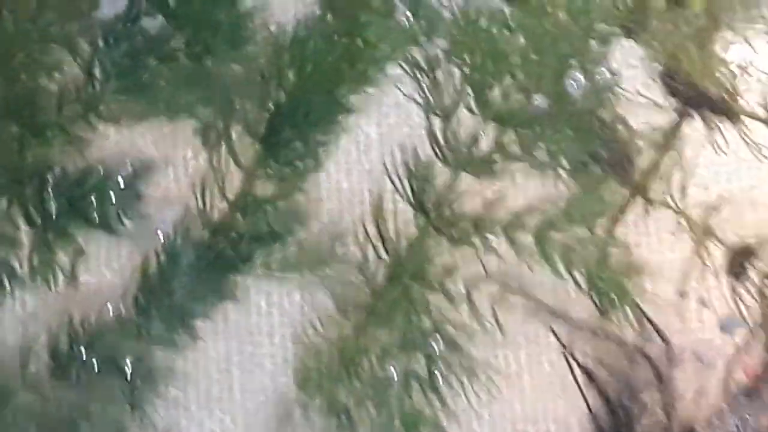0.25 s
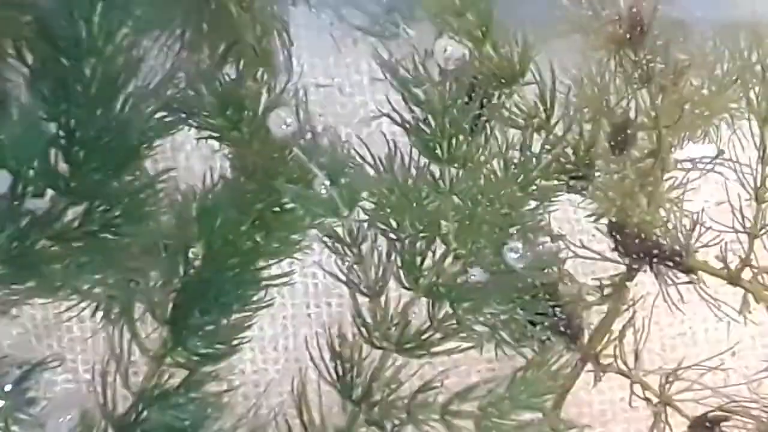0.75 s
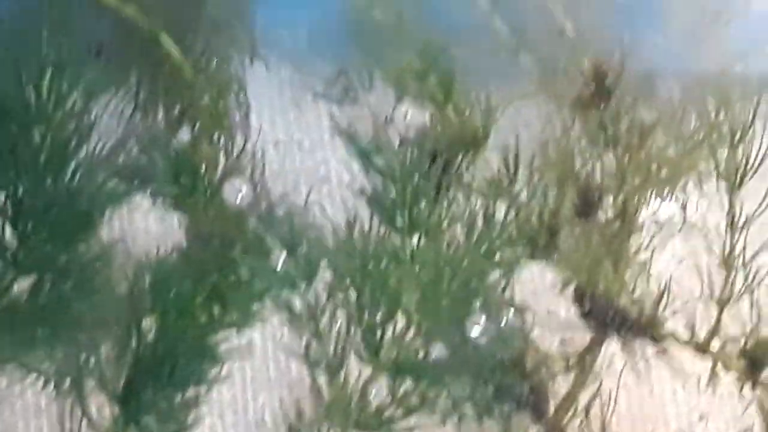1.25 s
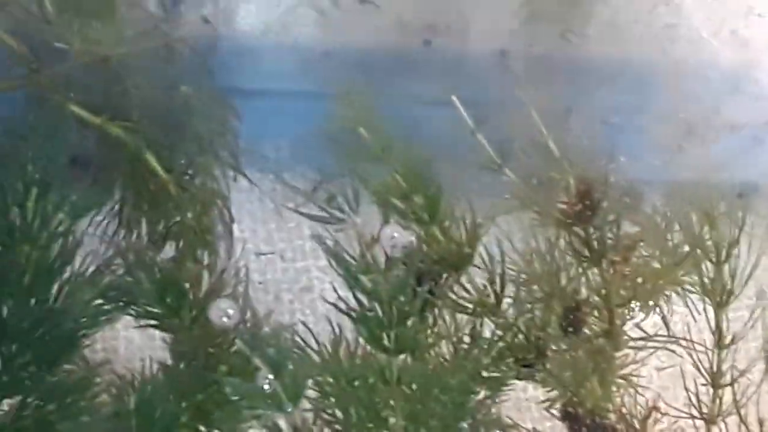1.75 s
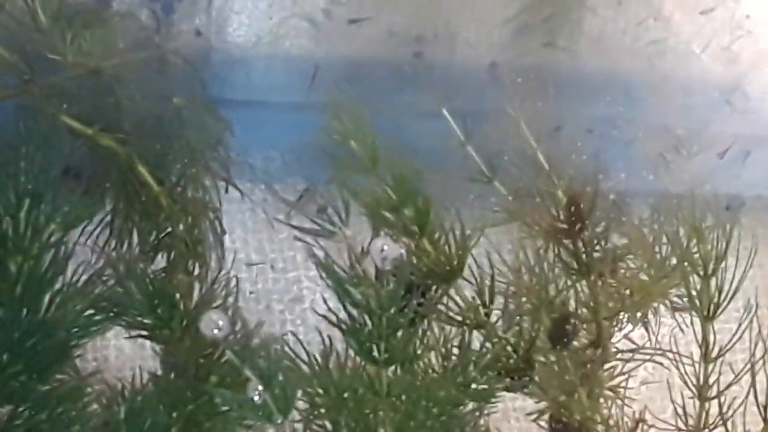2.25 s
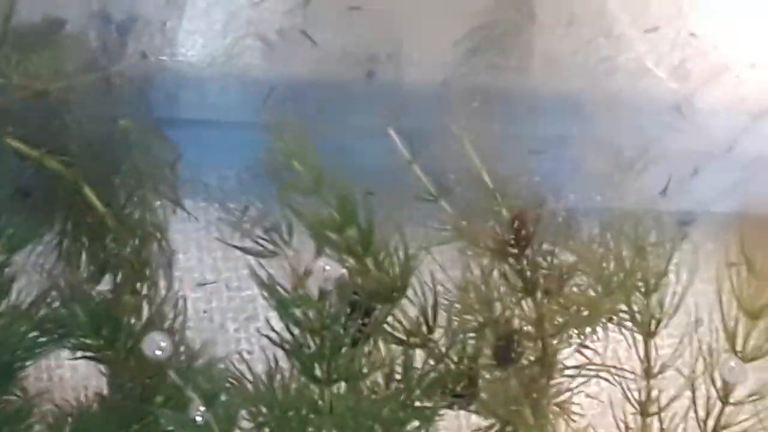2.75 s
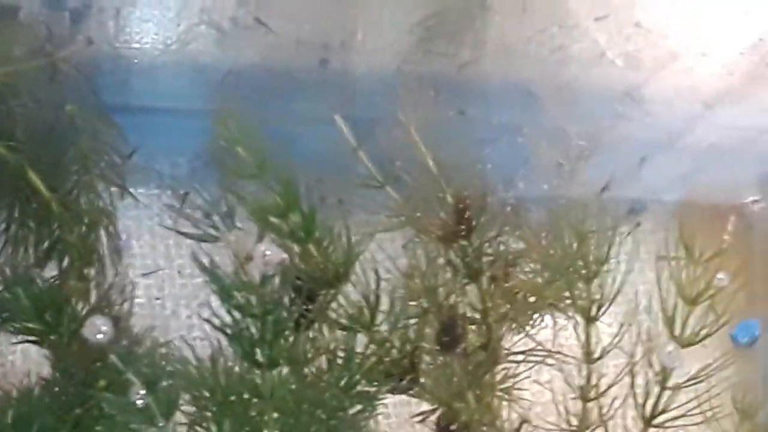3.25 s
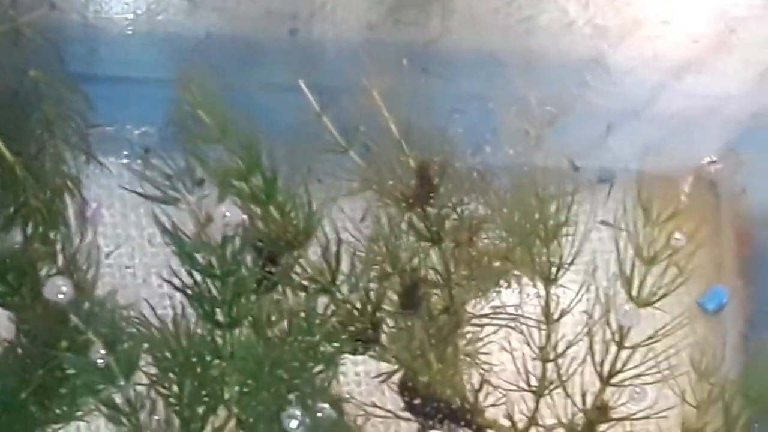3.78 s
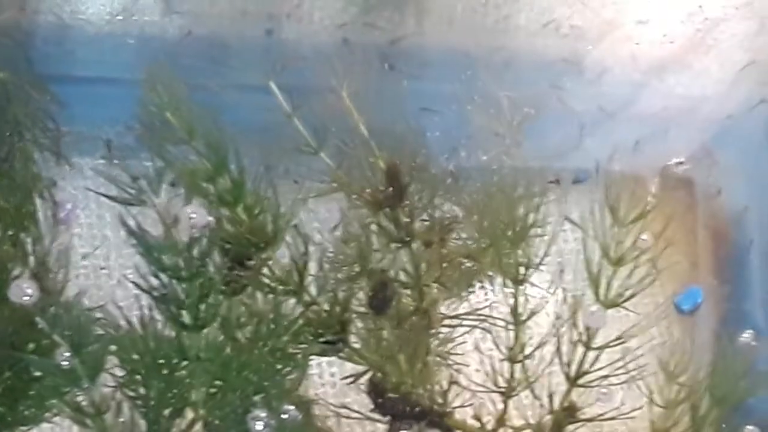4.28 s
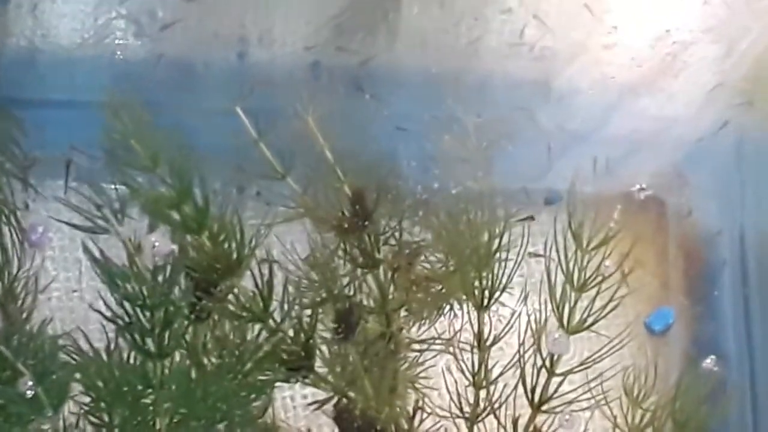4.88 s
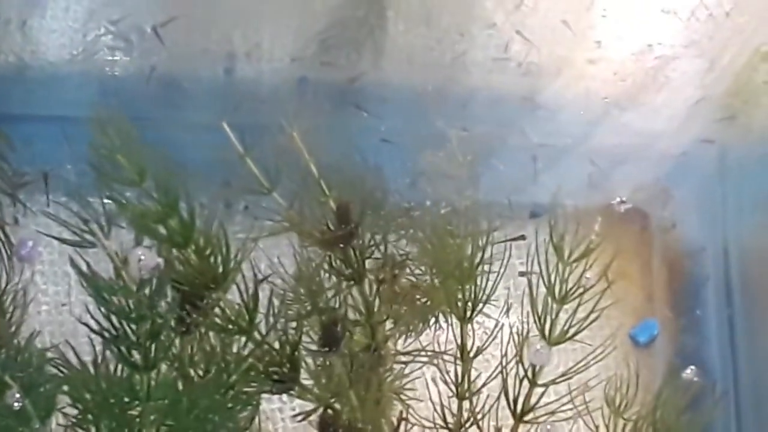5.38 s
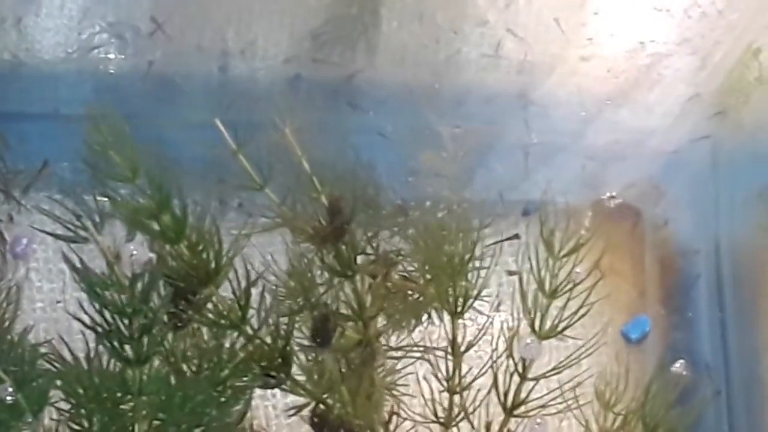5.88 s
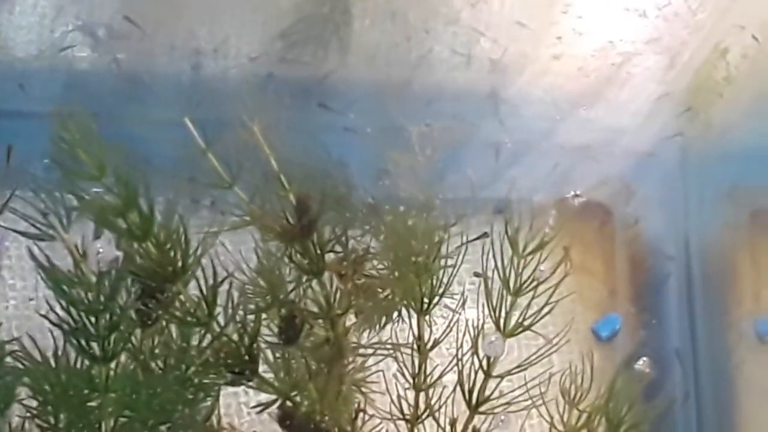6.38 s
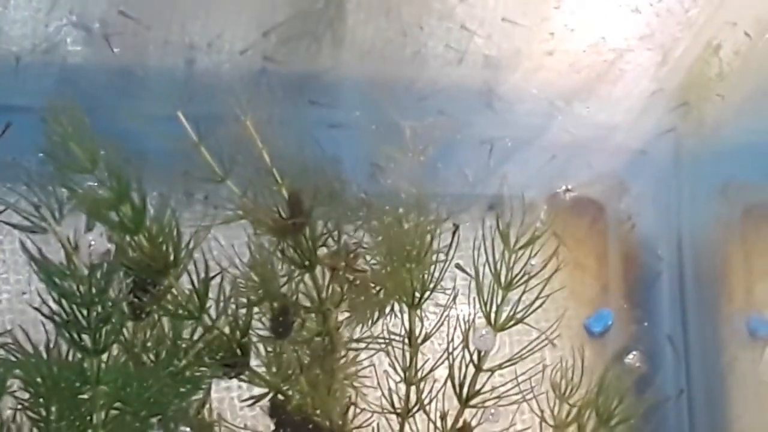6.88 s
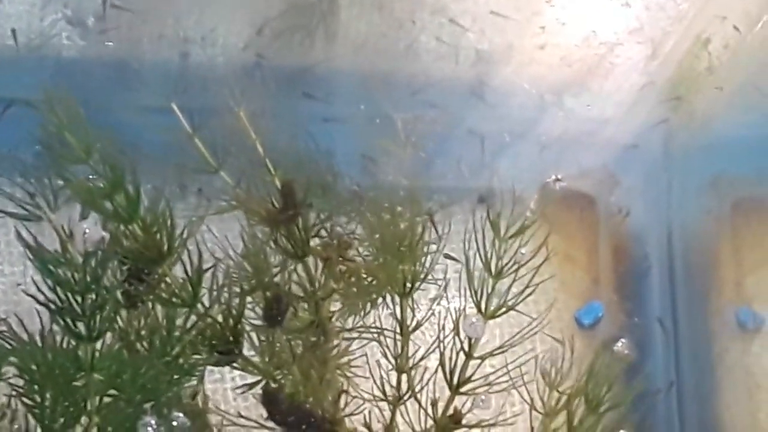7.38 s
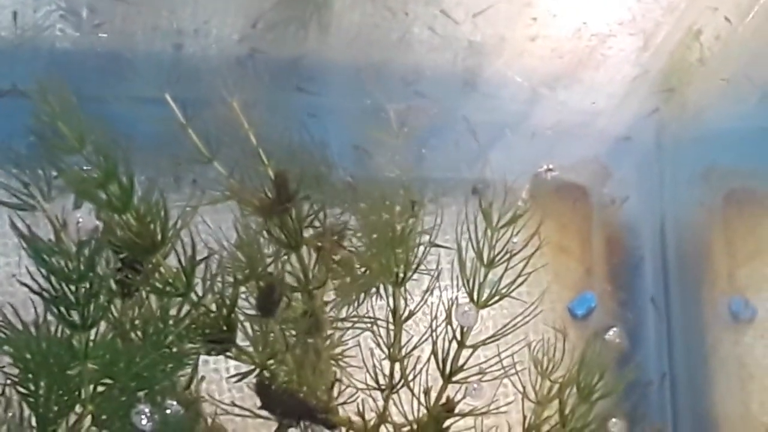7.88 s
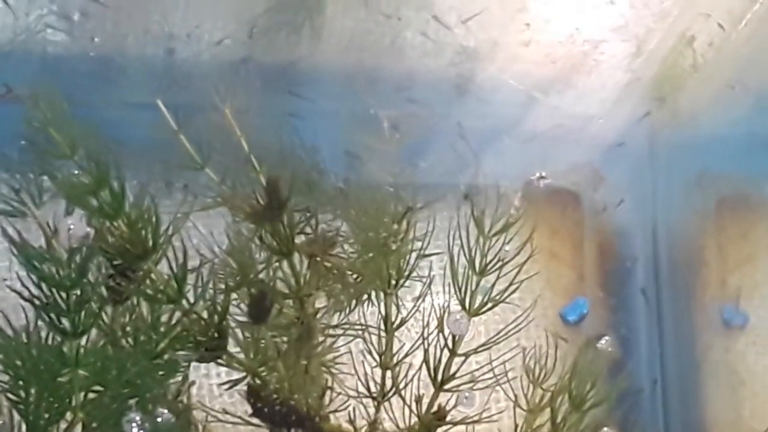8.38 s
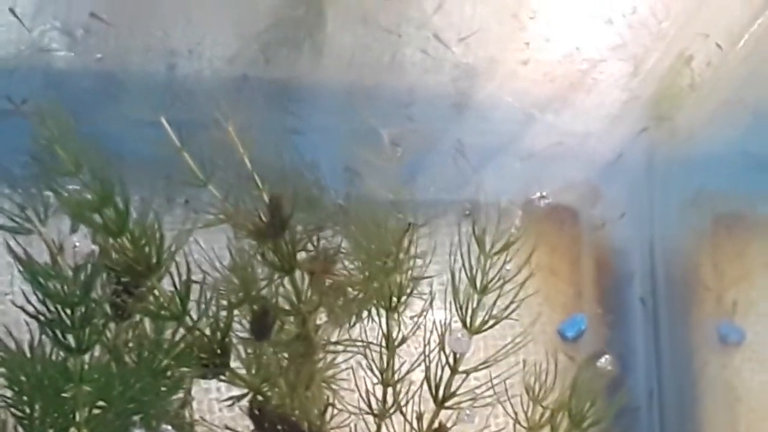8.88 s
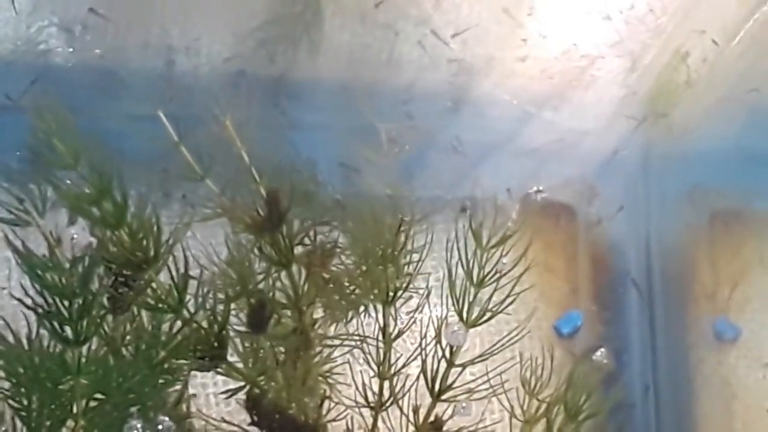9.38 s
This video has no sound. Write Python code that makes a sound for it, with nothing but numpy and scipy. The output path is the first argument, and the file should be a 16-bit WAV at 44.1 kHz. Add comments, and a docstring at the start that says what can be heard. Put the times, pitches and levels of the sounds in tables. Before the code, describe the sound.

For about 9.6 seconds an aquarium pump drones steadily, a deep 60-cycle hum rich in low harmonics, with soft rumbling churned water beneath; it grows slightly nearer in the first second, then stays put. Faint gurgling resonance of the tank walls sits in the midrange. Over it runs a continuous delicate fizz of bursting bubble films, crisp and irregular, with short crackling sprays, stronger near 0.7, 1.15, 1.9, 3.4 and 7.0 seconds. Single bubbles tick or plink at random, with very bright sharp ticks at about 5.0 and 5.8. Larger bubbles knock the wall hollowly near 1.7, 3.4, 3.55 and most clearly 5.35, then more softly around 7.0, 8.0 and 9.5. The fizz briefly swells around 4.1, 5.9 and 8.85 and dips at 4.3 and 9.2. Close microphone, small room, treble leaning left; the hum continues to the end.

```python
"""A mains-driven aquarium pump drones steadily in a small room: mains harmonics over churned-water noise.
Moving water excites the resonant modes of the tank walls, over a still background noise.
Bubble films burst at the surface in fizzing clumps, as short noise bursts passed through resonances.
Now and then a single bubble ticks or plinks as a decaying sine, or a larger one knocks the tank walls."""
import sys
import numpy as np
from scipy import signal
from scipy.fft import rfft, irfft
from scipy.io import wavfile

SR = 44100
rng = np.random.default_rng(int(sys.argv[2]) if len(sys.argv) > 2 else 0)


def unload_audio(sound):
    """Save the sound as a 16-bit wav file, at the path given as the first command line argument."""
    columns = np.transpose(np.atleast_2d(sound))
    # keep every value between -1 and 1, then stretch to whole-number steps
    steps = np.round(np.clip(columns, -1, 1) * 32767)
    wavfile.write(sys.argv[1], SR, steps.astype(np.int16))


N = 425124
TIME = np.arange(N) / SR  # s
BINS = np.fft.rfftfreq(N, 1 / SR)  # Hz


def amp(db):
    """Level law: decibels to amplitude gain."""
    return 10 ** (np.asarray(db) / 20)


def evened(x):
    """Power normalisation: scales to rms 1."""
    return x / np.sqrt(np.mean(x ** 2) + 1e-20)


def spectrum_at(points, hz):
    """Spectral interpolation: reads a table on a log-frequency axis."""
    f, value = np.transpose(points)
    return np.interp(np.log(hz + 1), np.log(f + 1), value)


def level_at(points, seconds):
    """Temporal interpolation: reads a table of times and levels in dB."""
    return np.interp(seconds, *np.transpose(points))


def add(mix, start_s, sound):
    """Superposition: sums a sound into the mix from its start time."""
    part = mix[..., max(round(start_s * SR), 0):][..., :sound.shape[-1]]
    part += sound[..., :part.shape[-1]]


def drift(rate_hz):
    """Slow random modulation: noise through a Gaussian low-pass, at rms 1."""
    smooth = np.exp(-(BINS / rate_hz) ** 2)
    return evened(irfft(rfft(rng.standard_normal(N)) * smooth, N))


def colour(x, points):
    """Minimum-phase filtering: the log gain alone fixes the phase of a causal response."""
    log_gain = np.log(amp(spectrum_at(points, abs(np.fft.fftfreq(2048, 1 / SR)))))
    taps = np.fft.ifft(np.exp(np.conj(signal.hilbert(log_gain)))).real
    return signal.oaconvolve(x, taps[None], axes=1)[:, :N]


def resonance(f, hz, width):
    """Damped resonance: the response of one mode, 1 at its centre."""
    return 1j * f * width / (hz ** 2 - f ** 2 + 1j * f * width)


# likeness of left and right noise: frequency_hz [Hz], likeness [0-1]
LIKENESS = [(60, 1), (300, 0.93), (640, 0.97), (1400, 0.72), (3000, 1), (15000, 0.72)]


def noise(gain):
    """Partial coherence: stereo noise of rms 1, the right channel sharing part of the left."""
    left, other = rfft(rng.standard_normal((2, N)))
    same = np.clip(spectrum_at(LIKENESS, BINS), 0, 1)
    right = same * left + np.sqrt(1 - same ** 2) * other
    return evened(irfft(np.array([left, right]) * gain, N))


# reverberation time of the small room: frequency_hz [Hz], t60_s [s]
REVERBERATION = [(200, 0.6), (1500, 0.32), (5000, 0.15), (15000, 0.082)]


def room(x, early_db, late_db, early_s):
    """Reverberation: sparse early reflections, then a tail decaying faster in the treble."""
    size = SR // 4
    t = np.arange(size) / SR
    taps = rng.standard_normal((2, size)) * (rng.random(size) < .12)
    early = (taps + 0.93 * taps[::-1]) * np.exp(-t / early_s) * (t > .0006)
    tail = rng.standard_normal((2, size)) * (t > .006)
    hz, at, z = signal.stft(tail, SR, nperseg=256)
    decay = amp(-60 * at / spectrum_at(REVERBERATION, hz)[:, None])
    late = signal.istft(z * decay, SR, nperseg=256)[1][:, :size]
    echo = (amp(early_db) * evened(early) + amp(late_db) * evened(late)) / np.sqrt(size)
    echo[:, 0] += 1  # the direct path
    return signal.oaconvolve(x * np.ones((2, 1)), echo, axes=1)[:, :N]


# relative spectrum of the still background: frequency_hz [Hz], density_db [dB per Hz]
BACKGROUND = [(300, 13.5), (640, -5.5), (950, 4.5), (2400, -11), (2800, -5), (4500, -2.5), (7400, -11.5),
              (9300, -13.5), (12000, -10), (15500, -4.5)]
# modes of the tank walls: pitch_hz [Hz], width_hz [Hz], flow_db [dB, relative, in the current],
# change_db [dB, start to end, as the microphone moves along the glass], struck_db [dB, relative, when struck]
WALL_MODES = [(796, 152, -6.5, -3.5, -25), (1207, 138, -4, -1.5, -31), (1289.5, 49, -3, -2, -9),
              (1415.5, 142, 2, -2.5, 3), (1574, 43, -7.5, -1.5, -28), (1733, 51, -9, -5.5, -10.5),
              (1946, 145, -8, 4, -25), (2068, 92, -10, -3, -1.5), (2307, 233, -6.5, -3, -11),
              (2479, 110, -20.5, -18, -9)]


def tank(ring_db=-67, background_db=-65.0, gurgle_db=2, gurgle_hz=11.3):
    """Modal excitation: the current drives each wall mode, whose level gurgles on its own."""
    current = rfft(noise(1))
    out = amp(background_db) * noise(amp(spectrum_at(BACKGROUND, BINS)))
    for hz, width, flow_db, change_db, _ in WALL_MODES:
        mode = evened(irfft(current * resonance(BINS, hz, width) ** 2, N))
        moved_db = change_db * (TIME / TIME[-1] - .5)
        out += mode * amp(ring_db + flow_db + gurgle_db * drift(gurgle_hz) + moved_db)
    return out


def pops(times, level_db, spread_db, splash_db, splash_s=0.0033, breadth=0.17, snap=0.23, small_db=3.5):
    """Impulsive radiation: each bursting film has its own strength, pitch, side and reflections."""
    size, count = 512, len(times)
    t, f = np.arange(size) / SR, np.fft.rfftfreq(size, 1 / SR)
    chance, pitch, lean = rng.random((count, 3)).T
    left, right = rng.standard_normal((count, 2, size)).transpose(1, 0, 2)
    splash = np.array([left + 1.1 * right, right + 1.44 * left]) * np.exp(-t / splash_s)
    splash = evened(splash) / np.sqrt(size)
    # high pops beam straight out; low ones bounce round the tank
    burst = splash * amp(splash_db - 8 * pitch)[:, None]
    burst[:, :, 0] += 1 + np.outer([1, -1], lean - .5) * .5
    hz = (3500 * (16000 / 3500) ** pitch)[:, None]
    burst = rfft(burst) * (snap + resonance(f, hz, breadth * hz))
    burst = evened(irfft(burst, size)) / np.sqrt(size)
    # most are faint and a few stand out, above all among the high ones
    rarity = np.minimum(-np.log(1 - chance), 4)
    strength = evened(amp((spread_db + small_db * (pitch - .5)) * rarity))
    burst *= (amp(level_db) * strength)[:, None]
    # each pop lands at its own moment
    at = (np.maximum(times, 0) * SR).astype(int)[:, None] + np.arange(size)
    return np.array([np.bincount(at.ravel(), side.ravel(), N)[:N] for side in burst])


def chains(count=330, size=10, chain_db=-48.5, uneven_db=7, chain_s=.0045):
    """Triggered cascade: a bursting film takes its neighbours with it; gives times and levels of pops."""
    chance = rng.random((count, 2 + 2 * size))
    starts = (np.arange(count) + 2 * chance[:, 0]) * N / SR / count
    # each neighbour waits twice, to be shaken and to give way, so a chain swells and dies
    waits = -chain_s * np.log(1 - chance[:, 2:]).reshape(count, size, 2).sum(axis=2)
    levels_db = chain_db + uneven_db * (chance[:, 1] - .5)
    return (starts[:, None] + waits).ravel(), np.repeat(levels_db, size)


# relative colour of the bursting films: frequency_hz [Hz], gain_db [dB]
FILM_COLOUR = [(500, -6), (1400, 9.5), (2300, 3.5), (2950, -2.5), (3800, 3), (5000, 1), (6200, 1.5),
               (7400, 7.5), (8400, -4), (9500, -6.5), (11500, 1), (13000, 0.5), (15000, 6), (16000, -3)]
# slow surges and lulls of single and chained pops: time_s [s], level_db [dB, relative]
SURGES = [(0, -3), (.2, 1.5), (1, 1), (2.25, 3), (3.15, 1.5), (3.65, -1.5), (4.12, 5.5), (4.27, -6.5),
          (4.42, 1.5), (5.7, 0.5), (5.9, 5.5), (6.5, -1.5), (6.81, 1), (6.88, -1), (7.9, -0.5), (8.85, 4.5),
          (9.18, -4.5), (9.64, 4.5)]
# rafts of bubbles that collapse together: start_s [s, nominal], level_db [dB, before the film colour]
COLLAPSES = [(.212, -46), (.329, -46), (.461, -45), (.667, -39), (1.15, -37.5), (1.235, -45.5),
             (1.592, -44), (1.65, -40.5), (1.922, -37.5), (2.298, -41), (2.515, -46), (2.87, -46.5),
             (3.192, -46), (3.412, -37), (3.837, -44), (3.919, -42), (4.377, -43), (4.688, -41.5),
             (4.799, -41.5), (4.932, -42), (5.03, -41.5), (5.249, -46), (5.497, -44), (5.883, -41.5),
             (6.023, -46), (6.305, -45.5), (6.926, -44), (7.034, -37.5), (7.18, -46.5), (7.28, -44),
             (7.512, -42), (8.128, -45.5), (8.309, -45), (8.747, -41), (8.86, -48.5), (9.451, -43.5)]
RAFT_S, RAFT_GROWTH = .02, .7  # half-length of a middling spray [s]; how strongly length follows level


def fizz(single_db=-52.0, count=2600):
    """Random point process: films burst singly, in chains and in the quick sprays of collapsing rafts."""
    times = rng.random(count) * N / SR
    singles = pops(times, single_db + level_at(SURGES, times), spread_db=1.0, splash_db=12.0)
    times, db = chains()
    chained = pops(times, db + level_at(SURGES, times), spread_db=3.5, splash_db=6.5)
    start_s, db = np.repeat(COLLAPSES, 30, axis=0).T  # 30 pops to a raft
    length = RAFT_S * amp(RAFT_GROWTH * (db - db.mean()))  # louder rafts last longer
    # a raft gives way gradually, bursting fastest in its middle
    times = start_s + length * rng.triangular(-.5, .5, 1.5, len(start_s))
    sprays = pops(times, db, spread_db=3.5, splash_db=6.5)
    return room(colour(singles + chained + sprays, FILM_COLOUR), early_db=-44, late_db=-8, early_s=.01)


def bubble(hz, cycles, rise, snap):
    """Volume oscillation: a film snaps and the air pocket rings, rising in pitch as it decays."""
    age = np.arange(SR // 30) / SR * hz / cycles  # in decay times
    phase = 2 * np.pi * cycles * (age + rise * (age - 1 + np.exp(-age)))
    ring = np.sin(phase) * np.exp(-age) * (1 - np.exp(-4 * age))
    ring /= abs(ring).max()
    ring[:2] += snap * np.array([1, -1])
    return ring


# single bubbles, low blips through plinks to high ticks:
# start_s [s], level_db [dB peak of the ring before snap and echoes], pitch_hz [Hz at the onset]
SINGLE_BUBBLES = [(.3326, -47, 13200), (.7741, -45, 6900), (.8131, -42, 15500), (1.0056, -48, 13500),
                  (1.1408, -47, 15400), (1.2805, -43, 13700), (1.3229, -51, 4060), (1.8317, -42, 15400),
                  (1.856, -39.5, 11800), (1.856, -41.5, 6700), (1.9307, -41.5, 5050),
                  (1.9849, -41.5, 15100), (2.0782, -37, 15500), (2.156, -52, 3400), (2.1765, -43, 11200),
                  (2.3224, -39, 6900), (2.3416, -45.5, 14100), (2.7272, -52, 12000), (2.882, -49, 4470),
                  (3.2076, -40, 15300), (3.364, -48, 3400), (3.3847, -36, 15400), (3.419, -59, 780),
                  (3.5455, -36.5, 5100), (3.9654, -45, 13500), (3.967, -42, 4640), (4.3832, -39.5, 7260),
                  (4.6089, -45, 15300), (4.805, -59, 840), (5.028, -30.5, 14500), (5.25, -62, 795),
                  (5.3067, -44.5, 11500), (5.36, -51, 3180), (5.5982, -47, 15000), (5.7433, -44, 15600),
                  (5.8156, -28, 14500), (6.8902, -41, 15400), (7.0134, -43.5, 3700), (7.011, -49, 4240),
                  (7.1881, -37, 14200), (7.2923, -48, 7400), (7.9813, -51, 3580), (8.092, -51, 3600),
                  (8.74, -58, 4200), (8.8692, -50, 7690), (9.031, -43.5, 7200), (9.2945, -42.5, 7400),
                  (9.45, -59, 805), (9.497, -54.5, 3100), (9.5771, -41, 15000)]
# how a bubble's size sets its ring and echoes: pitch_hz [Hz], cycles [per decay time], snap [0-1],
# early_db [dB], early_decay_s [s], room_db [dB]
RING_BY_PITCH = [(800, 7.5, 0, 0.5, 0.0065, -16), (3180, 2.8, 0, -1, 0.0083, 1),
                 (7400, 3, 0.1, -3, .0055, -7), (12000, 4.8, 0, 2.5, .0028, -8)]


def bubbles():
    """Size scaling: the pitch of each single bubble sets its damping, snap and echoes."""
    out = np.zeros((2, N))
    pitches, *columns = np.transpose(RING_BY_PITCH)
    for start_s, db, hz in SINGLE_BUBBLES:
        cycles, snap, early_db, early_s, late_db = (np.interp(hz, pitches, column) for column in columns)
        ring = amp(db) * bubble(hz, cycles, rise=.008, snap=snap)
        add(out, start_s, room(ring, early_db, late_db, early_s))
    return out


# large bubbles that knock the tank: start_s [s], level_db [dB peak], pitch_hz [Hz, strongest in the blow]
BLOWS = [(0.679, -49.5, 1800), (0.813, -54, 2400), (1.6771, -48, 1440), (2.077, -50, 1650),
         (2.727, -55, 2490), (3.3974, -44, 1610), (3.4194, -59, 1900), (3.5453, -40, 2270),
         (4.303, -55, 2490), (4.609, -57, 1900), (5.3605, -39.5, 1770), (7.0106, -48, 1410),
         (7.981, -47.5, 1700), (8.093, -48.5, 1500), (9.492, -48.5, 2000)]


def knocks(breadth=0.97, ring_width_hz=32):
    """Impulse response: a large bubble's collapse strikes the walls, which crack and ring in their modes."""
    size = SR // 5
    f = np.fft.rfftfreq(size, 1 / SR)
    crack = .045  # flat part of the response
    walls = crack + sum(amp(struck_db) * resonance(f, hz, ring_width_hz) for hz, *_, struck_db in WALL_MODES)
    out = np.zeros((2, N))
    for start_s, db, hz in BLOWS:
        ring = irfft(walls * resonance(f, hz, breadth * hz) ** 2, size)
        heard = room(ring, early_db=2, late_db=-5, early_s=0.012)
        add(out, start_s, amp(db) * heard / abs(heard).max())
    return out


MAINS_HZ = 60.004
# pump harmonics: multiple [of the mains frequency], level_db [dB rms, before nearness]
HARMONICS = [(1, -55), (2, -52), (3, -56.5), (4, -49), (5, -54), (6, -58.5), (7, -68), (8, -85.5),
             (10, -96), (12, -88.5), (13, -84), (19, -85), (21, -79), (22, -75.5)]
# resonances of the pump on its feet: pitch_hz [Hz], width_hz [Hz]
CASING_MODES = [(90, 15), (210, 15), (390, 15)]
# relative spectrum of water churning in the pump: frequency_hz [Hz], density_db [dB per Hz]
CHURNED_WATER = [(20, -27), (40, -27), (52, -7.5), (100, -4), (125, 3), (195, -11.5), (240, -6), (300, 1),
                 (375, -13.5), (410, -5), (490, -5), (580, -20.5), (650, -26), (1500, -48.5)]
# swell of the upper part of the churn: time_s [s], level_db [dB, relative]
UPPER_SWELL = [(0, -3.5), (2, -1), (3.8, 0.5), (5.2, 1.5), (6.8, 0), (9.64, -1)]
# nearness of the pump: time_s [s], level_db [dB, relative]
NEARNESS = [(0, -0.5), (.9, 1.6), (2.5, 1.2), (3.8, 1), (5.2, 0.6), (7.5, 0.5), (9.64, 0.3)]


def pump(waver=0.012, wander_rad=0.037, churn_db=-56.5, upper_hz=440):
    """Forced vibration: the armature swings at mains harmonics, over the rumble of churned water."""
    angle = 2 * np.pi * MAINS_HZ * TIME + wander_rad * drift(0.11)
    hum = np.zeros(N)
    for k, db in HARMONICS:
        # each casing resonance delays the harmonics above it by half a turn
        lag = sum(np.pi / 2 - np.angle(resonance(k * MAINS_HZ, hz, width)) for hz, width in CASING_MODES)
        hum += amp(db) * np.sqrt(2) * np.sin(k * angle - lag)
    hum *= 1 + waver * drift(2.5)
    churn = amp(churn_db) * noise(amp(spectrum_at(CHURNED_WATER, BINS)))
    low = irfft(rfft(churn) * (BINS < upper_hz), N)
    churn = low + (churn - low) * amp(level_at(UPPER_SWELL, TIME))
    return (hum + churn) * amp(level_at(NEARNESS, TIME))


# stereo placing: frequency_hz [Hz], left_right_db [dB, left over right]
PLACING = [(60, 0), (120, .2), (190, 1.6), (350, 2), (600, 2.2), (1350, 4.3), (2300, 2.6), (5000, 3.6),
           (15000, 4.9)]


def scene():
    """Interaural level difference: the sum leans a little left, the treble more than the bass."""
    mix = tank() + fizz() + bubbles() + knocks() + pump()
    side_db = spectrum_at(PLACING, BINS) / 2
    gain = amp([side_db, -side_db])
    return irfft(rfft(mix) * gain / gain.mean(0), N)


def record(dry, edge_hz=16000):
    """Band limitation: a linear-phase low-pass removes the highest treble."""
    taps = signal.firwin(511, edge_hz, window=("kaiser", 9), fs=SR)
    return signal.oaconvolve(dry, taps[None], "same")


dry = scene()
out = record(dry)
unload_audio(out)
```